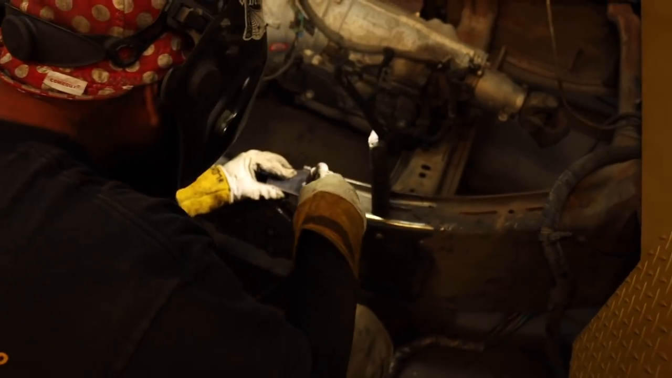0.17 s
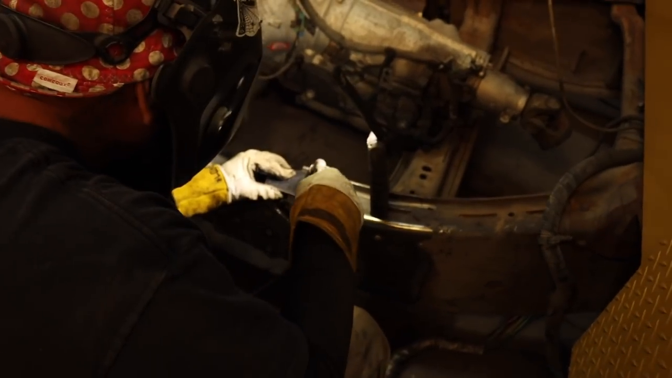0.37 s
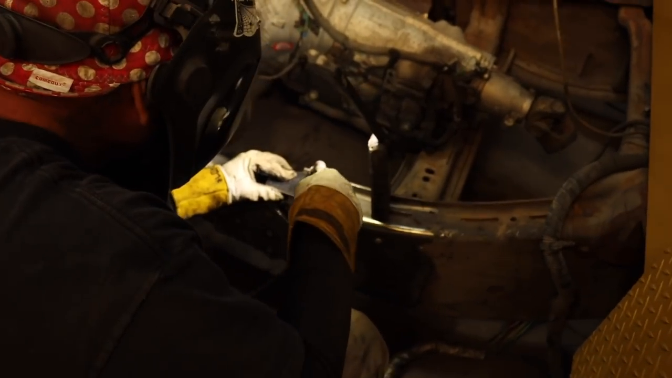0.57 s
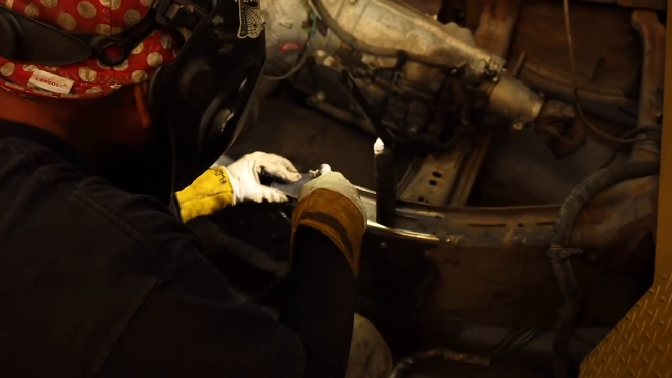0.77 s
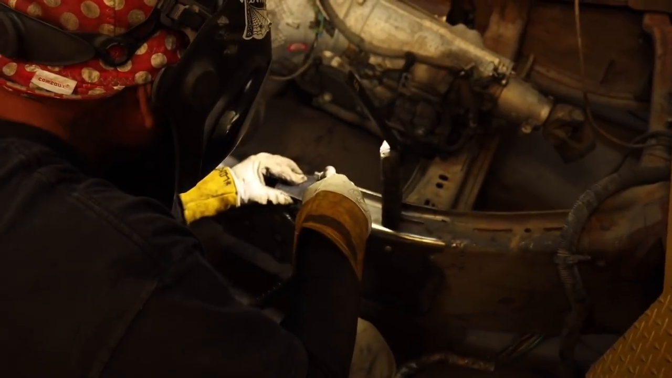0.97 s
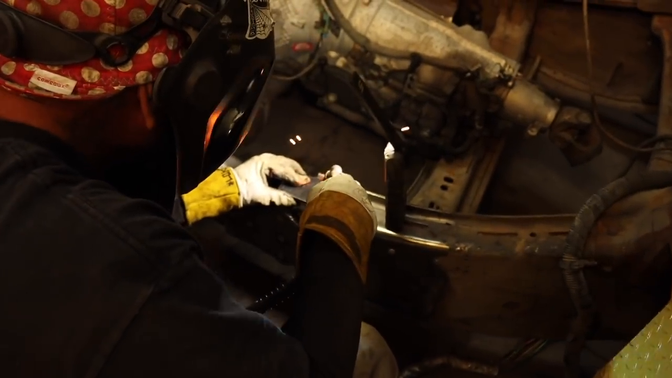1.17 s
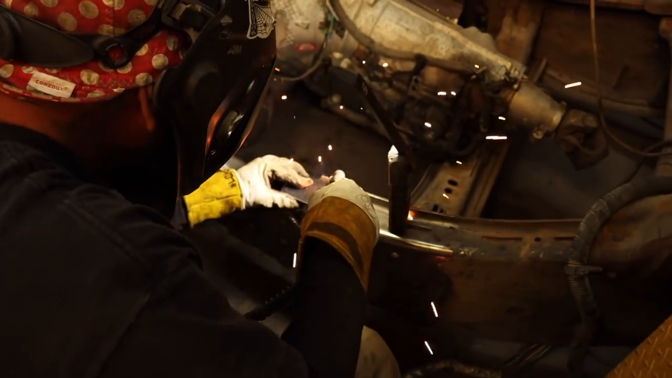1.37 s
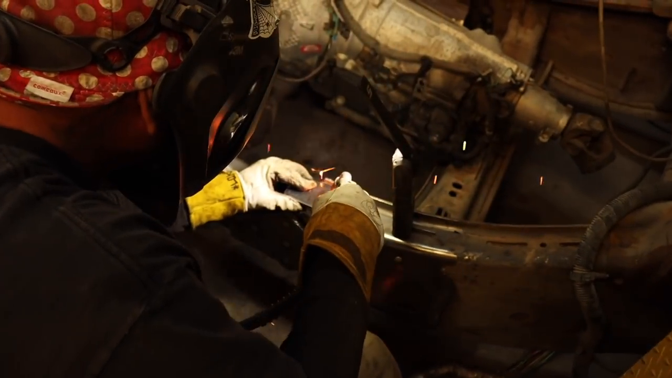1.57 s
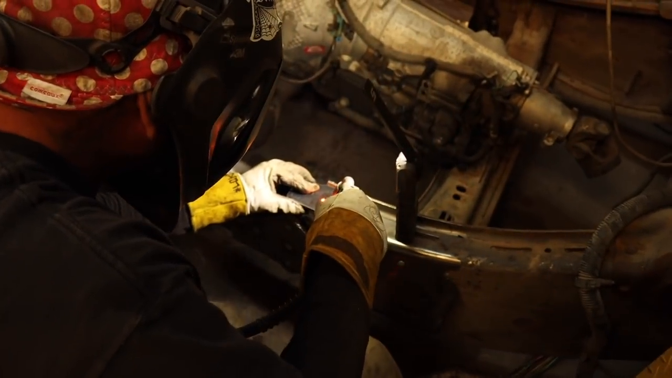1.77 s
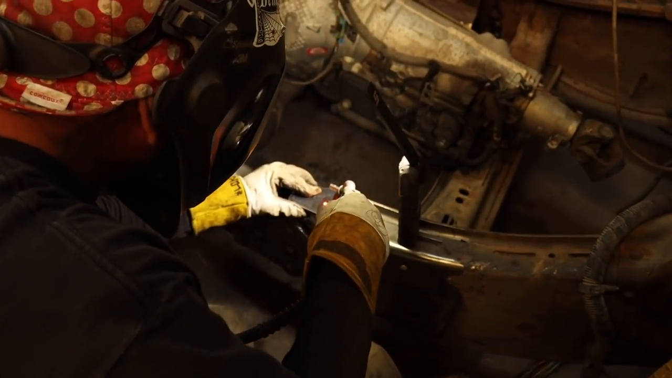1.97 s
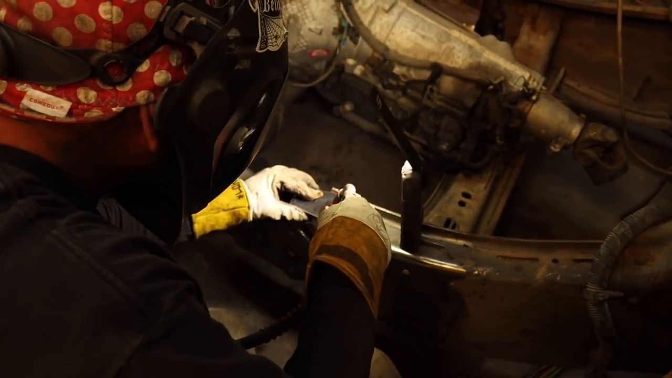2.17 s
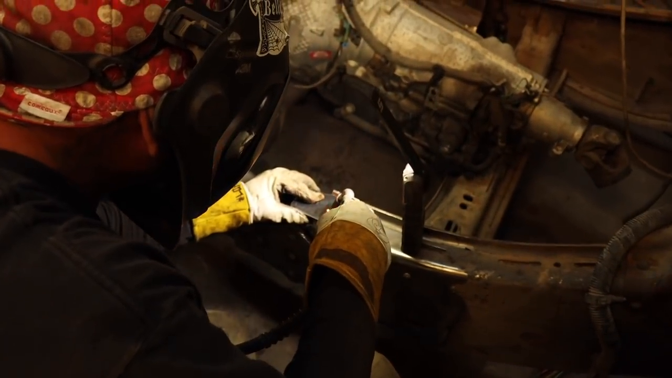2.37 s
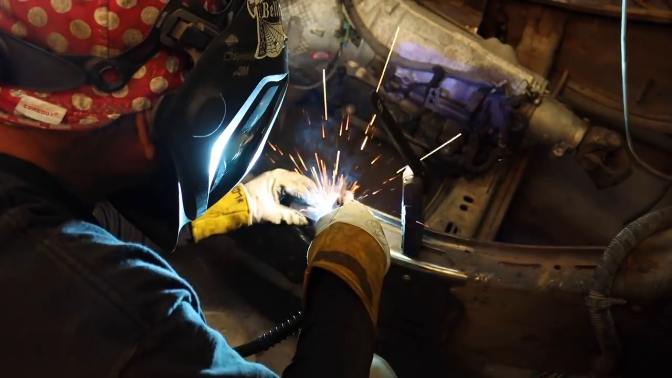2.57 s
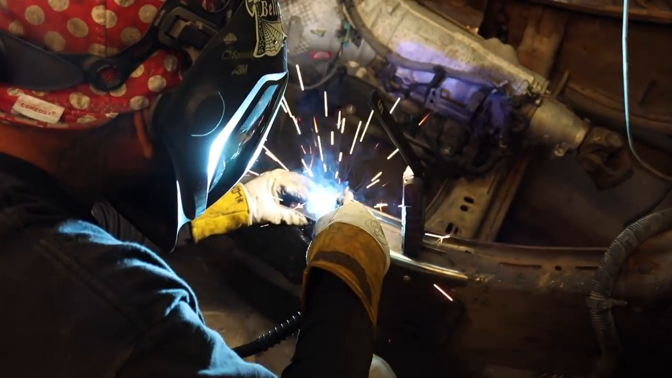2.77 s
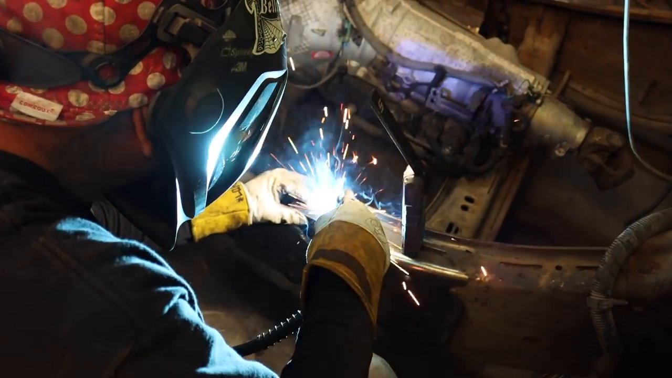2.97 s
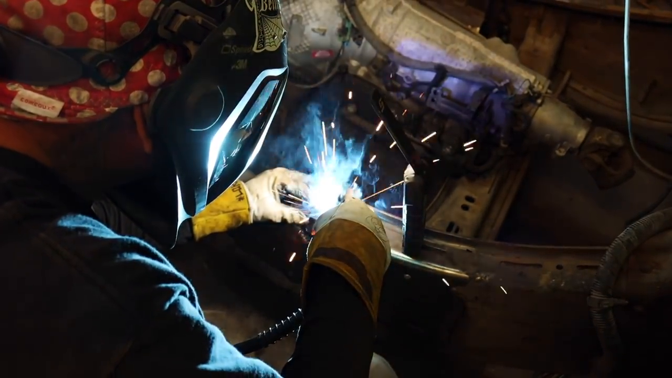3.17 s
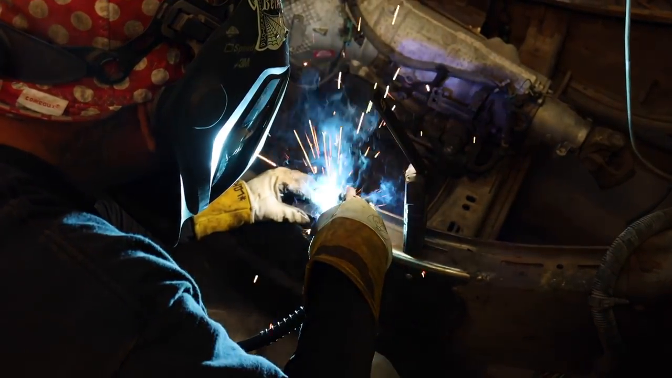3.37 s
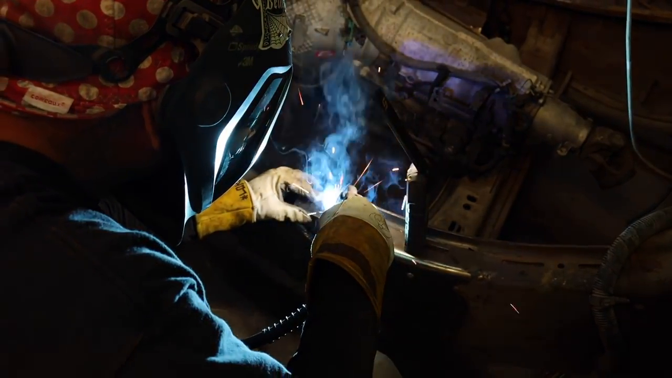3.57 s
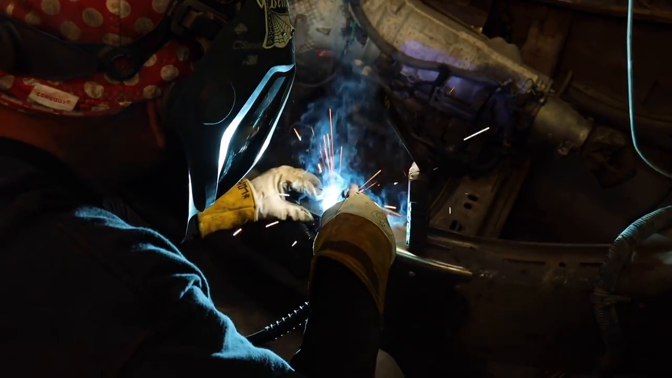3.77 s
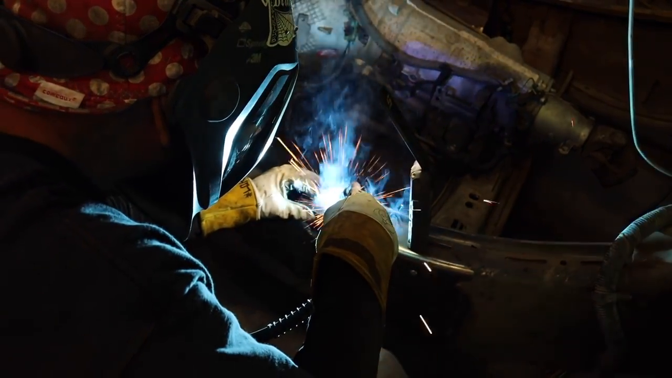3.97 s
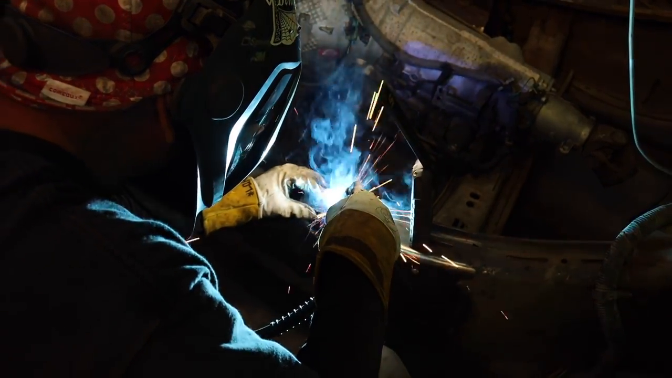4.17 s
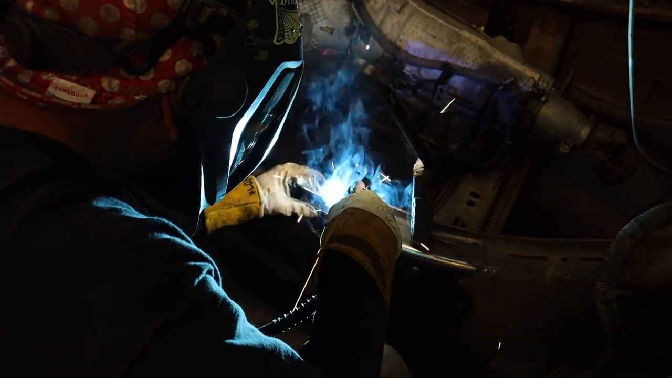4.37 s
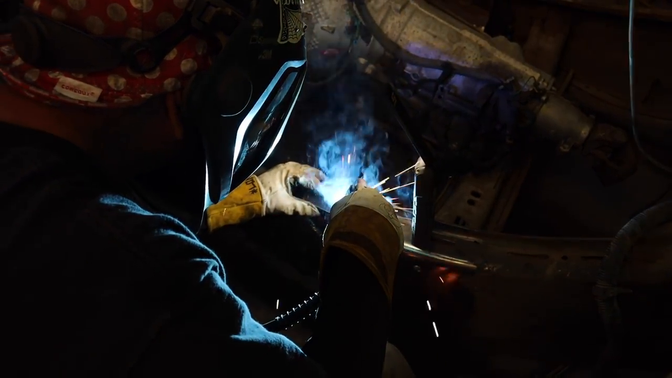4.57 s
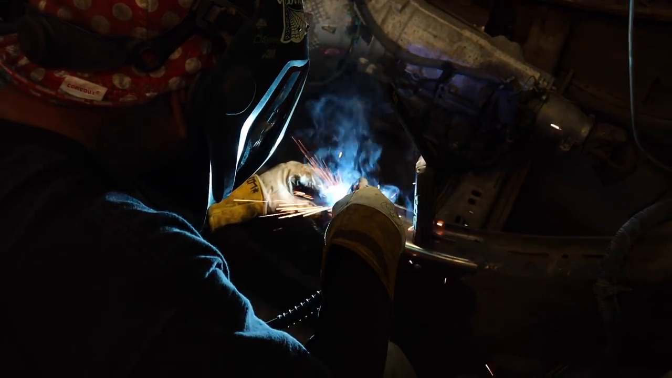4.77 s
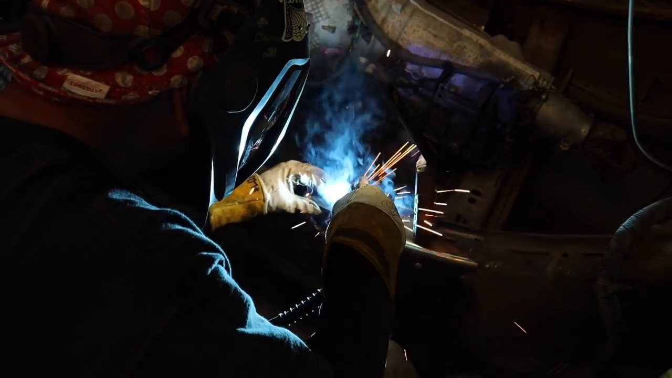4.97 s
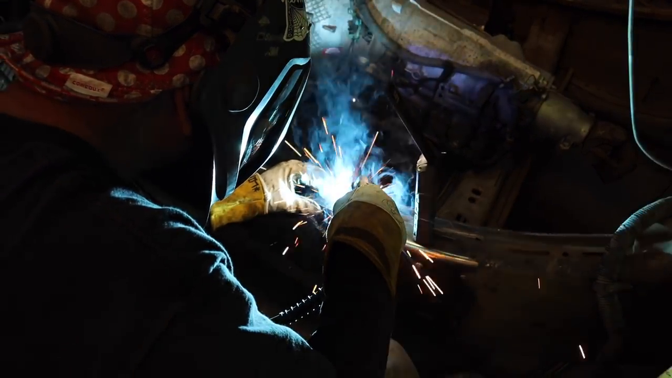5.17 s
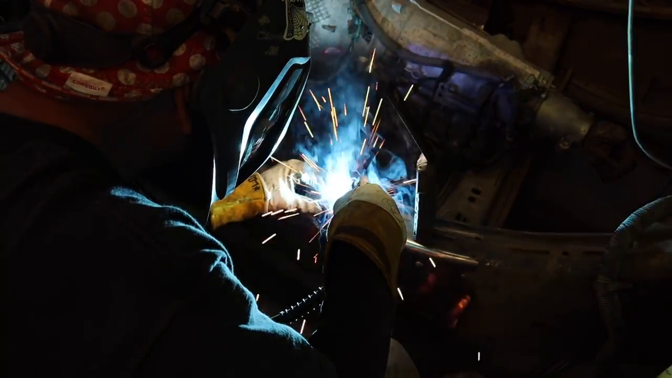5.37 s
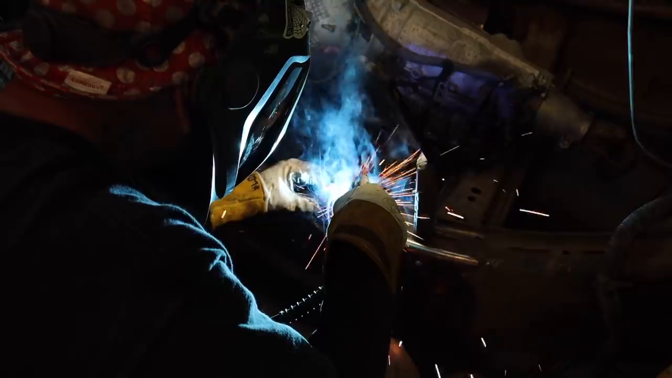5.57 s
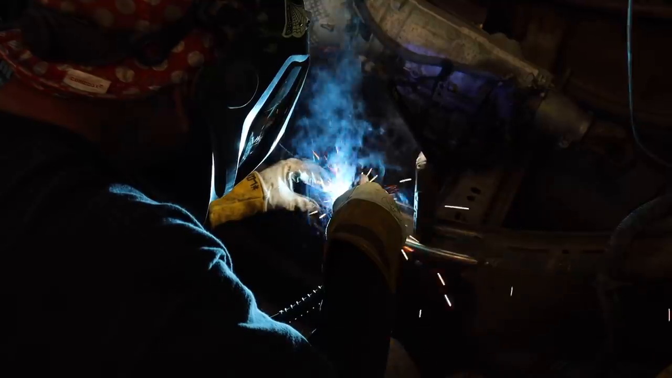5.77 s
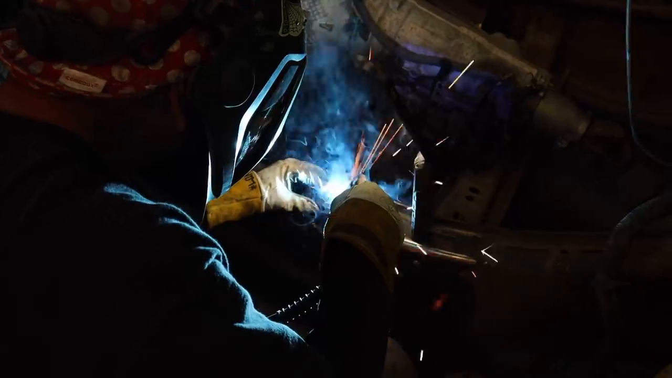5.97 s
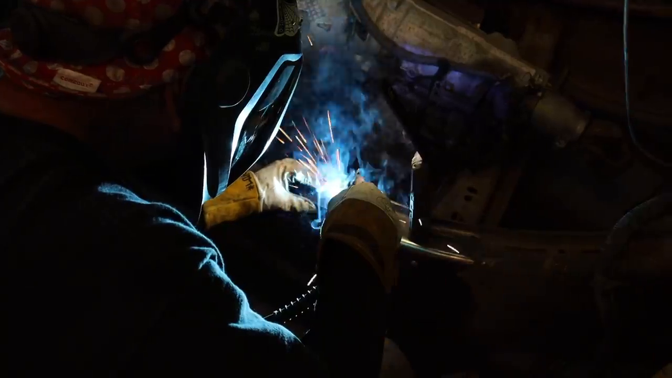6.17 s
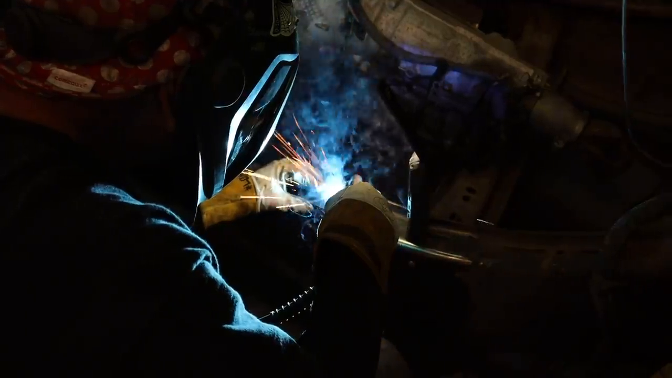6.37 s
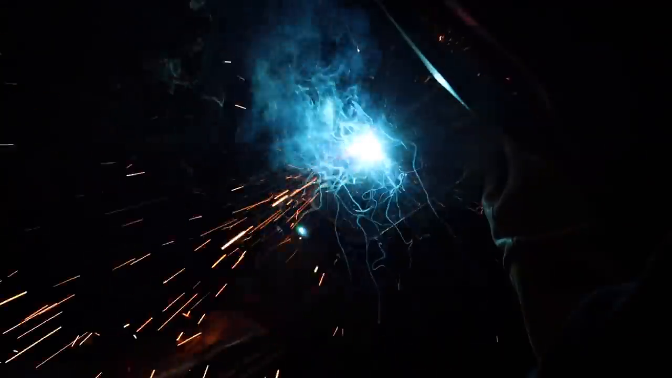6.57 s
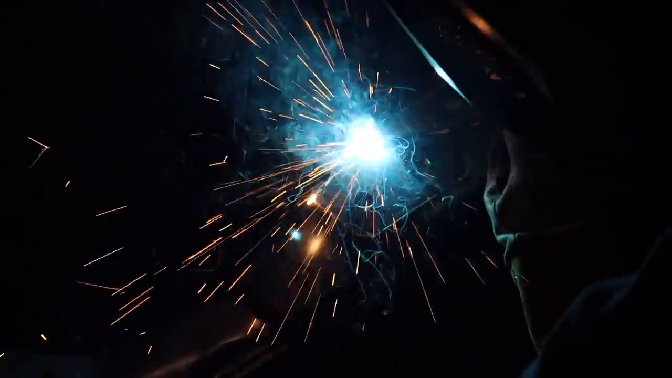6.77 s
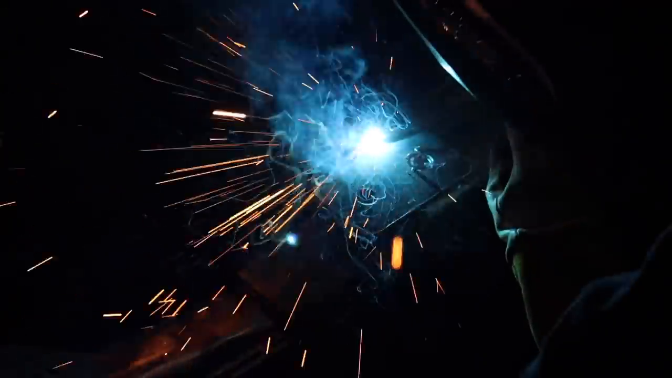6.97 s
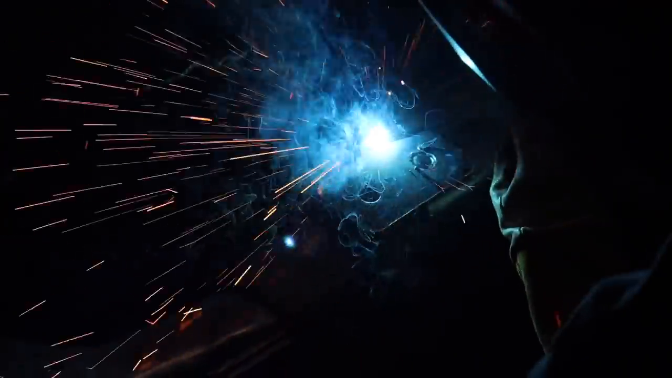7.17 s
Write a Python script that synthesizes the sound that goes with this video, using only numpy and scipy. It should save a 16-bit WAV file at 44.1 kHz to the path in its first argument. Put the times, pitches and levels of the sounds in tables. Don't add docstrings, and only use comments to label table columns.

```python
import sys
import numpy as np
from scipy import signal
from scipy.fft import rfft, irfft
from scipy.io import wavfile
from scipy.ndimage import uniform_filter1d

SR = 44100
rng = np.random.default_rng(int(sys.argv[2]) if len(sys.argv) > 2 else 0)


def generate_wav(sig):
    pcm = np.round(np.clip(np.atleast_2d(sig).T, -1, 1) * 32767).astype(np.int16)
    wavfile.write(sys.argv[1], SR, pcm)


def voltage_ratio(decibels):
    exponent = np.asarray(decibels, float) / 20
    return 10 ** exponent


N = 317520
T = np.arange(N) / SR
ARC_START_S, MOVE_S = 2.47, 6.485

# (time [s], peak [dB])
STRIKES = [
    (1.056, -22),
    (1.0965, -0.5),
    (1.2345, -25),
    (1.266, -36),
    (1.2921, 4),
    (1.336, -14),
    (2.111, -45),
]
# (start [s], snaps [count],
# spacing [ms], peak [dB])
FIRST_PLACE_BURSTS = [(2.4696, 2, 22.2, 0.9), (2.5796, 2, 14.6, -2.5), (2.6034, 5, 5.9, -6.5),
                      (2.6365, 2, 8.0, -2.2), (2.7197, 2, 18.0, 0.6), (2.7456, 2, 12.6, -0.5),
                      (2.7716, 4, 8.1, -4.3), (2.8464, 2, 33.4, -0.1), (2.8934, 2, 10.3, -1.2),
                      (2.9144, 6, 7.5, -6.4), (2.9612, 2, 23.2, -1.2), (2.9982, 3, 24.3, -0.2),
                      (3.0694, 4, 8.8, -1.8), (3.1112, 5, 8.9, -5.0), (3.163, 2, 47.3, -4.3),
                      (3.2301, 4, 13.6, -1.7), (3.2951, 2, 9.5, -2.7), (3.3354, 6, 12.7, -2.9),
                      (3.422, 3, 23.9, -5.1), (3.4785, 3, 22.0, -3.3), (3.5551, 2, 17.6, -4.7),
                      (3.584, 2, 23.5, -7.8), (3.6369, 3, 28.0, -4.1), (3.7241, 3, 23.5, -5.7),
                      (3.7876, 2, 25.3, -4.3), (3.8333, 2, 30.3, -1.0), (3.881, 3, 24.0, -2.9),
                      (3.9656, 2, 24.5, -7.0),
                      (4.009, 11, 17.3, -4.7), (4.2028, 5, 14.1, -4.9), (4.2872, 5, 13.8, -1.8),
               (4.3641, 3, 20.5, -4.2), (4.417, 3, 20.4, -1.5), (4.4699, 3, 17.9, -1.3),
               (4.5475, 2, 25.2, -3.5), (4.5955, 7, 12.3, -3.9), (4.688, 2, 24.8, -1.0),
               (4.7265, 2, 15.7, -1.8), (4.7685, 4, 18.3, -3.7), (4.8652, 6, 17.2, -3.4),
               (4.9661, 6, 19.0, -3.9), (5.0765, 3, 11.3, -6.0), (5.1065, 3, 14.5, -6.4),
               (5.1547, 4, 23.9, -5.2), (5.236, 4, 14.4, -6.9), (5.2881, 5, 18.8, -5.3),
               (5.3748, 2, 19.4, -6.4), (5.4151, 4, 11.1, -3.2), (5.468, 11, 13.9, -4.8),
               (5.621, 5, 16.7, -2.6), (5.701, 13, 14.2, -4.8), (5.8794, 9, 15.8, -2.5),
               (6.0245, 5, 17.3, -3.6), (6.1079, 4, 13.0, -2.2), (6.1625, 2, 17.1, -1.1),
               (6.1974, 5, 22.0, -2.3), (6.3057, 5, 13.6, -3.9), (6.3884, 5, 22.2, -1.4)]
SECOND_PLACE_BURSTS = [(6.4936, 3, 14.7, -5.9), (6.5426, 7, 13.6, -4.4), (6.6386, 5, 13.0, -6.4),
                       (6.7139, 2, 8.5, -7.0), (6.7376, 4, 7.6, -4.7), (6.7732, 9, 8.7, -5.2),
                       (6.8513, 3, 9.7, -2.1), (6.8868, 8, 11.3, -4.3), (6.9763, 5, 12.7, -3.7),
                       (7.0407, 5, 10.9, -3.0), (7.1008, 8, 13.0, -4.8)]
WOBBLE_MS, UNEVEN_DB = 0.6, 1.1
TOUCH_LEAD_S, TOUCH_DB = 0.0032, -19
# (time [s], peak [dB])
CRACKLES = [(2.485, -12), (2.5742, -22), (2.658, -16), (2.7093, -27), (2.842, -23.5), (2.8643, -25),
            (4.1817, -4), (2.7197, -14), (3.1872, -12), (3.2044, -10.5), (3.24, -17), (3.2868, -14),
            (3.6022, -21), (4.3937, -13), (6.7676, -16.5), (3.5116, -20.5), (3.9563, -17), (3.961, -17),
            (4.3527, -29), (4.478, -12.5), (4.5369, -13), (4.5845, -25), (5.382, -18), (5.6651, -27),
            (5.0039, -2), (6.502, -22), (6.5343, -28), (6.6316, -22), (6.707, -16)]
# (time [s], level [dB])
SIZZLE = [
    (2.5, -28),
    (2.9, -19),
    (3.23, -22),
    (3.75, -26.5),
    (4.31, -23),
    (4.84, -22.5),
    (5.07, -30),
    (5.3, -23.5),
    (6.3, -21.5),
    (7.2, -22.5),
]

# (frequency [Hz], width [Hz], level [dB])
SNAP_MODES_A = [(390, 200, -23), (5060, 230, -4), (1110, 385, -7), (1624, 130, -9.5), (2176, 360, -25.5),
                (2420, 494, -3), (3070, 900, -17), (3320, 340, -5), (7510, 170, -3.5), (8790, 370, -2.5),
                (11940, 690, -7.5), (783, 560, -21), (14300, 1500, -12)]
# (frequency [Hz], width [Hz], level [dB])
SNAP_MODES_B = [(374, 320, -26), (940, 224, -13.5), (1710, 230, -6), (2870, 210, -2.5), (3850, 410, -16.5),
                (9800, 160, -4.5), (10600, 400, -9), (13200, 500, -11.5), (15500, 1100, -19.5)]
# (delay [ms], gain [ratio])
ECHOES_A = [(1.15, -.35), (1.95, -.4), (3.2, -.2), (4.7, -.16)]
# (delay [ms], gain [ratio])
ECHOES_B = [(1.1, 0.052), (2.03, 0.1), (3.1, -0.13), (5.6, 0.054), (6.75, -.2)]
# (frequency [Hz], density [dB per Hz])
STRIKE_COLOUR = [(120, -57.5), (200, -19), (933, -13), (1320, -18), (1620, -8.5), (1810, -26.5),
                 (2170, -4.5), (3970, -3.5), (16000, -21)]
# (frequency [Hz], density [dB per Hz])
SCATTER_COLOUR_A = [(150, -66.5), (250, -25.5), (890, -14.5), (1160, -10.5), (2020, -12), (2300, -6),
                    (2960, -10), (3300, -5), (4260, -7), (5090, -1.5), (6700, -12), (11900, -12.5),
                    (16000, -23)]
# (frequency [Hz], density [dB per Hz])
SCATTER_COLOUR_B = [(150, -47), (250, -31), (373, -18), (586, -17), (922, -8), (1580, -14), (1820, -7.5),
                    (2050, -16), (2710, -12), (3980, -4.5), (5250, -5.5), (6590, -10.5), (16000, -12)]
# (frequency [Hz], width [Hz], depth [dB])
DIPS_A = [(1678, 56, -8), (2926, 95, -7.5), (4030, 170, -6), (4790, 110, -2.5), (5530, 190, -2),
          (12750, 400, 3)]
# (frequency [Hz], width [Hz], depth [dB])
DIPS_B = [(570, 76, -7), (1284, 60, -10), (1640, 120, -10.5), (2070, 190, -15.5), (2490, 120, -7),
          (3160, 130, -5), (4000, 160, -10), (4570, 200, -6), (6820, 330, -3.5)]
# (frequency [Hz], width [Hz], depth [dB])
LATE_DIP = [(6670, 230, -13.5)]
# (start [s], end [s])
LATE_DIP_S = (3, 5.8)

# (time [s], gas flow length [s], surge [dB], steady [dB])
PULLS = [
    (.93, .41, -33, -41.5),
    (2.365, 4.9, -34, -37),
]
GAS_RISE_S, SURGE_PEAK_S, SURGE_WIDTH_S, GAS_STOP_DB_PER_S = 0.028, 0.093, 0.083, 250
# (frequency [Hz], density [dB per Hz])
GAS_COLOUR = [(180, -52.5), (300, -4.5), (418, -18.5), (614, -13), (774, -25), (885, -10), (1460, -3.5),
              (3240, -9.5), (5080, -3.5), (16000, -31)]
# (time [s], level [dB])
VALVE_KNOCKS = [
    (.95, -31),
    (2.378, -27),
]

# (frequency [Hz], density [dB per Hz])
FAN_COLOUR = [(15, -49.5), (25, -22.5), (117, -20), (153, -19), (200, -7), (249, -18.5), (503, -16),
              (560, -12.5), (607, -16.5), (818, -10), (1190, -19.5), (1740, -25), (16000, -62.5)]
FAN_RUSH_DB, BLADE_HZ, BLADE_DB = -38, 200, -48.5
# (band centre [Hz], T60 [s], level [dB])
GARAGE = [(303, 0.735, -37), (920, 1.4, -31.5), (1850, 1.5, -44.5), (3340, 1.19, -30.5),
          (5570, 0.62, -37.5), (7640, 0.39, -41), (11700, 0.29, -40.5)]

# (time [s], gain [dB])
GAIN = [(0, 0), (1.08, 1), (1.088, -3), (1.3, -5), (1.325, 1), (2.44, -.5), (2.447, -12), (3, -5.5),
        (3.6, -12), (4.3, -9.5), (7.2, -9)]
# (time [s], half length [s])
LEVEL_DIPS = [
    (1.086, 0.012),
    (1.324, 0.015),
    (1.444, 0.0091),
    (2.444, 0.0082),
]
SELF_NOISE_DB, TOP_HZ = -73, 15900
THUMP_DB, THUMP_HZ = -15.5, 150


def arc(events, modes, echoes, colour, live, spit_db, fizz_db, hiss_db, scatter_db, scatter_t60, **shape):
    s, db = np.transpose(events)
    gain = voltage_ratio(db + 0.58 * np.maximum(db + 6.0, 0) + 2.5 - np.interp(s, *np.transpose(GAIN)))
    clicks = spikes(s, gain)
    along_seam = np.clip((s - s[0]) / (s[-1] - s[0]) + 0.08 * rng.standard_normal(len(s)), 0, 1)

    sizzle = live * voltage_ratio(curve(SIZZLE) - curve(GAIN) + 2.1 * walk(60))
    pops = rng.random(N) < 500 / SR
    pop_gain = voltage_ratio(2.1 * rng.exponential(size=N).clip(0, 2.5))
    fizz = pops * pop_gain * sizzle * voltage_ratio(fizz_db)

    t = np.arange(2048) / SR
    scatter = voltage_ratio(scatter_db - 60 * t / scatter_t60) * coloured(colour, 2048)
    scatter = even(scatter * (1 - np.exp(-(t / 0.0011) ** 2)), colour)
    seam_start = blend(snap(modes, echoes, 0.99, **shape), scatter)
    seam_end = blend(snap(modes, echoes, 1.01, **shape), scatter)
    out = through(spikes(s, gain * (1 - along_seam)) + fizz, seam_start)
    out += through(spikes(s, gain * along_seam), seam_end)

    spit = through(clicks, voltage_ratio(spit_db - 60 * t / 0.022) * (1 - np.exp(-t / 0.00019)))
    return out + (spit + voltage_ratio(hiss_db) * sizzle) * coloured(colour, N), clicks


def snap(modes, echoes, shift, nozzle_hz, nozzle_ms, crack_ms, ring_db, push_db):
    t = np.arange(2048) / SR
    u = 1000 * t / crack_ms
    crack = -np.exp(-(u - 2) ** 2) + 0.41 * np.exp(-(u / 1.95 - 2.8) ** 2)
    nozzle = -0.8 * np.exp(-(1000 * t / nozzle_ms) ** 4) * np.sin(2 * np.pi * nozzle_hz * shift * t)
    h = crack + nozzle
    for ms, gain in echoes:
        lag = int(ms * shift * SR / 1000)
        h[lag:] += gain * (crack + 0.5 * nozzle)[:-lag]
    for k, (hz, width_hz, db) in enumerate(modes):
        decay = np.exp(-np.pi * max(width_hz, 250.0) * t)
        h += (-1) ** k * voltage_ratio(db + ring_db) * decay * np.sin(2 * np.pi * hz * shift * t)
    h += voltage_ratio(push_db) * (np.exp(-t / 0.0022) - 0.23 * np.exp(-t / 0.0063))
    return h / np.abs(h[:64]).max()


def shorts():
    out = []
    for start, snaps, ms, db in FIRST_PLACE_BURSTS + SECOND_PLACE_BURSTS:
        k = np.arange(int(snaps))
        chance = rng.standard_normal((len(k), 2)).T
        inner = (k > 0) & (k < k[-1])
        times = start + (k * ms + WOBBLE_MS * inner * chance[0]) / 1000
        out += zip(times, db + UNEVEN_DB * chance[1])
    return out


def touches(events):
    s = np.array(events)[:, 0]
    rested = np.diff(s) > 0.011
    chance = rng.standard_normal((len(s) - 1, 2))
    times = s[1:] - TOUCH_LEAD_S + 0.0002 * chance[:, 0]
    levels = TOUCH_DB + 3 * chance[:, 1]
    return list(zip(times[rested], levels[rested]))


def trigger():
    gas = flow() * voltage_ratio(0.89 * walk(40)) * coloured(GAS_COLOUR, N)
    s, db = np.transpose(VALVE_KNOCKS)
    t = np.arange(8192) / SR
    case = coloured([(300, -21), (500, 11.5), (850, 9.0), (1450, -4.5), (2200, -25)], 8192)
    knock = case * voltage_ratio(-60 * t / 0.18) * np.minimum(t / 0.0085, 1)
    return gas + through(spikes(s, voltage_ratio(db)), knock)


def flow():
    out = 0
    for s, length, surge_db, steady_db in PULLS:
        t = np.maximum(T - s, 0)
        surge = voltage_ratio(surge_db) * np.exp(-((t - SURGE_PEAK_S) / SURGE_WIDTH_S) ** 2)
        rise = 1 - np.exp(-(t / GAS_RISE_S) ** 2)
        shut = voltage_ratio(-GAS_STOP_DB_PER_S * np.maximum(t - length, 0))
        out = out + (surge + voltage_ratio(steady_db)) * rise * shut
    return out


def fan():
    phase = 2 * np.pi * np.cumsum(BLADE_HZ + 2.59 * walk(13)) / SR
    tone = voltage_ratio(2.7 * walk(6.8)) * np.sin(phase)
    rush = voltage_ratio(FAN_RUSH_DB - 3.0 + walk(13.83)) * coloured(FAN_COLOUR, N)
    return rush + level(tone, BLADE_DB)


def garage(clicks):
    t = np.arange(SR + SR // 2) / SR
    tail = 0
    for hz, t60, db in GARAGE:
        band = signal.butter(2, [hz / 1.236, hz * 1.255], "band", fs=SR, output="sos")
        tail = tail + signal.sosfilt(band, rng.standard_normal(len(t))) * voltage_ratio(db - 60 * t / t60)
    return through(clicks, tail * np.minimum(t / 0.008, 1))


def dips(x, table):
    for hz, width_hz, db in table:
        w, g = 2 * np.pi * hz / SR, voltage_ratio(min(db, 0) / 2)
        a = np.sin(w) * width_hz / hz / 2
        x = signal.lfilter([1 + a * g, -2 * np.cos(w), 1 - a * g], [1 + a / g, -2 * np.cos(w), 1 - a / g], x)
    return x


def even(h, colour):
    spec = rfft(h, 4096)
    have = uniform_filter1d(np.abs(spec) ** 2, size=13)
    want = spectrum(colour, 4096)
    out = irfft(spec * minimum_phase(np.log(want / np.sqrt(have))))[:len(h)]
    return out * np.sqrt(np.sum(h ** 2) / np.sum(out ** 2))


def blend(direct, scatter):
    def power(h):
        return uniform_filter1d(np.abs(rfft(h, 4096)) ** 2, size=9)

    both = direct + scatter
    fill = np.log((power(direct) + power(scatter)) / power(both)) / 2
    return irfft(rfft(both, 4096) * minimum_phase(fill))[:len(direct)]


def minimum_phase(log_gain):
    cep = irfft(log_gain)
    cep[1:2048] *= 2
    cep[2049:] = 0
    return np.exp(rfft(cep))


def spectrum(points, size):
    hz, db = np.transpose(points)
    f = np.maximum(np.fft.rfftfreq(size, 1 / SR), 1)
    return voltage_ratio(np.interp(np.log(f), np.log(hz), db))


def coloured(points, size):
    return level(irfft(rfft(rng.standard_normal(size)) * spectrum(points, size), size), 0)


def walk(rate_hz):
    k = int(SR / rate_hz)
    held = np.repeat(rng.standard_normal(N // k + 1), k)
    return 1.4 * uniform_filter1d(uniform_filter1d(held, k), k)[:N]


def spikes(s, gain):
    out, at = np.zeros(N + 2), np.clip(s * SR, 0, N - 1)
    np.add.at(out, at.astype(int), gain * (1 - at % 1))
    np.add.at(out, at.astype(int) + 1, gain * (at % 1))
    return out[:N]


def through(x, h):
    return signal.oaconvolve(x, h)[:N]


def curve(rows):
    s, v = np.transpose(rows)
    return np.interp(T, s, v)


def level(x, db):
    return x * voltage_ratio(db) / np.sqrt(np.mean(x ** 2))


def scene():
    run = shorts()
    snaps = sorted(run + CRACKLES + touches(run))
    first = [e for e in snaps if e[0] < MOVE_S]
    second = [e for e in snaps if e[0] >= MOVE_S]
    cold, clicks = arc(
        STRIKES, SNAP_MODES_A, ECHOES_A, STRIKE_COLOUR, live=0,
        spit_db=-8, fizz_db=0, hiss_db=0, scatter_db=-16.5, scatter_t60=0.047,
        nozzle_hz=4800, nozzle_ms=0.79, crack_ms=0.041, ring_db=-2.5, push_db=-24.5)
    a, clicks_a = arc(
        first, SNAP_MODES_A, ECHOES_A, SCATTER_COLOUR_A, live=(T > ARC_START_S) & (T < MOVE_S),
        spit_db=-20, fizz_db=-4, hiss_db=-10.5, scatter_db=-7, scatter_t60=0.019,
        nozzle_hz=5100, nozzle_ms=1.1, crack_ms=0.034, ring_db=-1.5, push_db=-19.5)
    b, clicks_b = arc(
        second, SNAP_MODES_B, ECHOES_B, SCATTER_COLOUR_B, live=T >= MOVE_S,
        spit_db=-20, fizz_db=-1.0, hiss_db=-9, scatter_db=-10.5, scatter_t60=0.044,
        nozzle_hz=5300, nozzle_ms=0.9, crack_ms=0.017, ring_db=-6, push_db=-18.5)
    room = garage(clicks + voltage_ratio(-7.5) * (clicks_a + clicks_b))
    late = np.interp(T, LATE_DIP_S, [0, 1])
    a = (1 - late) * a + late * dips(a, LATE_DIP)
    return (cold + dips(a, DIPS_A) + dips(b, DIPS_B) + room + trigger() + fan())[None]


def band_limit(x):
    return signal.sosfilt(signal.butter(12, 16480, fs=SR, output="sos"), x)


def record(dry):
    dry = dry + voltage_ratio(SELF_NOISE_DB) * rng.standard_normal(N)
    gain = voltage_ratio(curve(GAIN))
    for s, half_s in LEVEL_DIPS:
        gain = gain * np.clip(np.abs(T - s) / half_s, 0.06, 1)
    ceiling = np.interp(T, [1.4, 2.4], [1.05, 0.69])
    x = dry * gain / ceiling
    x = ceiling * x / (1 + np.abs(x) ** 4) ** (1 / 4)
    low_pass = signal.butter(2, THUMP_HZ, fs=SR, output="sos")
    x = x + voltage_ratio(THUMP_DB) * signal.sosfilt(low_pass, x ** 4)
    x = signal.sosfilt(signal.ellip(6, 0.2, 45, TOP_HZ, fs=SR, output="sos"), x)
    return band_limit(x)


dry = scene()
out = record(dry)
generate_wav(out)
```